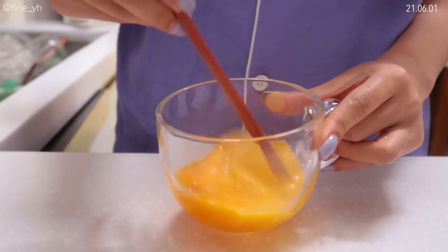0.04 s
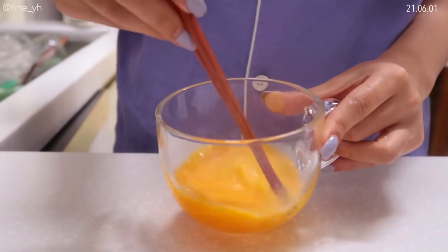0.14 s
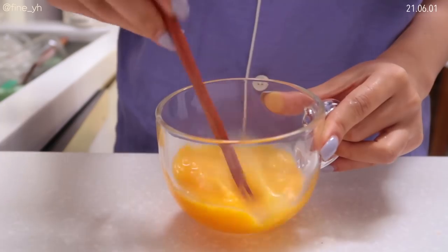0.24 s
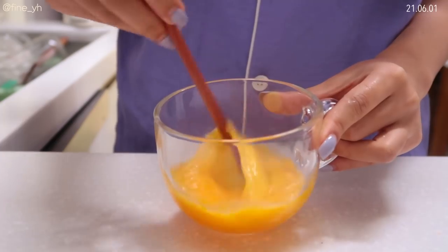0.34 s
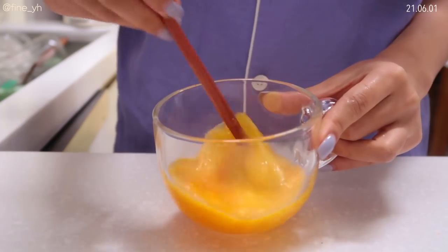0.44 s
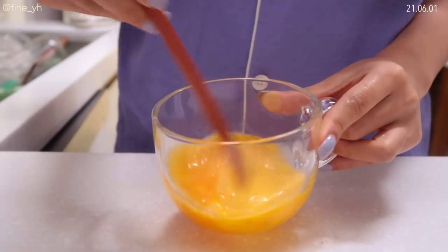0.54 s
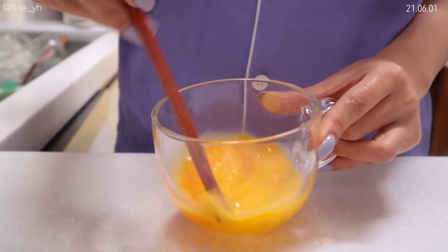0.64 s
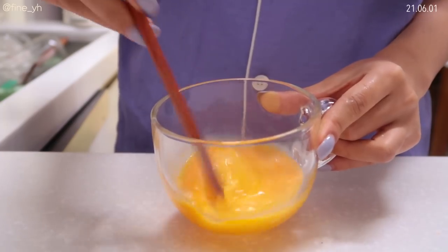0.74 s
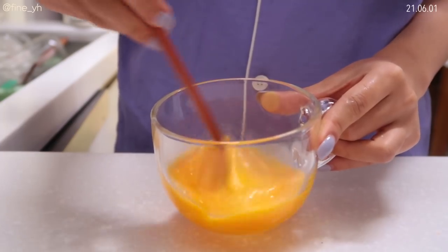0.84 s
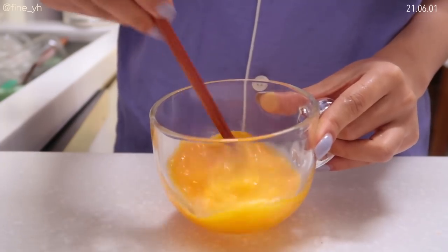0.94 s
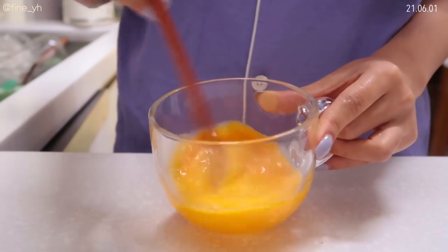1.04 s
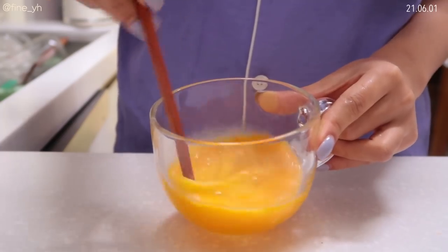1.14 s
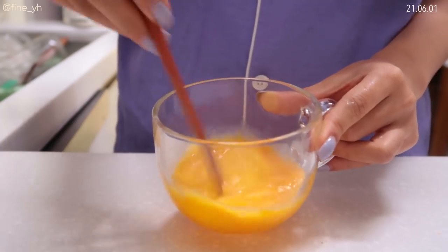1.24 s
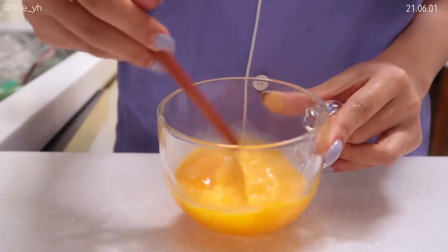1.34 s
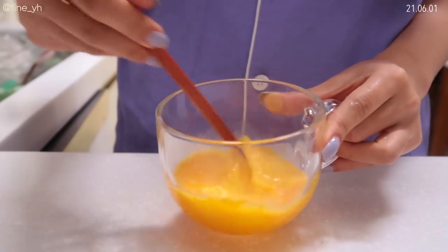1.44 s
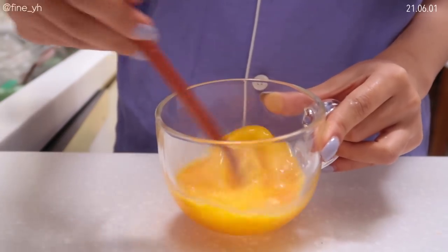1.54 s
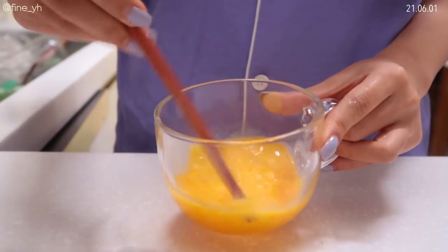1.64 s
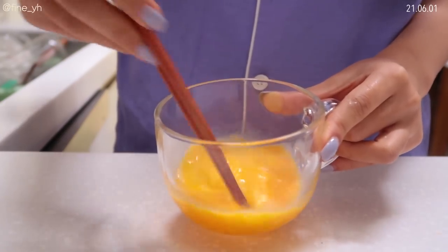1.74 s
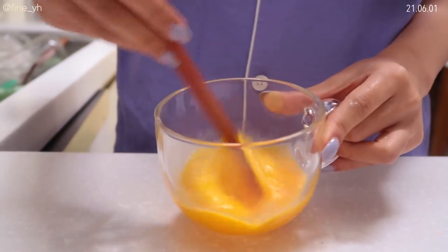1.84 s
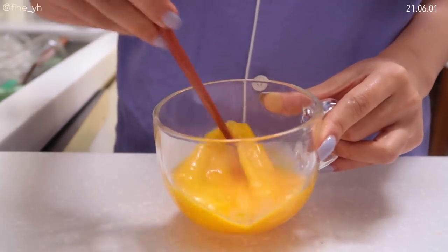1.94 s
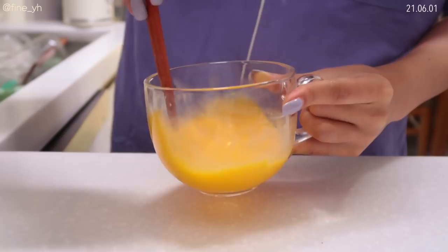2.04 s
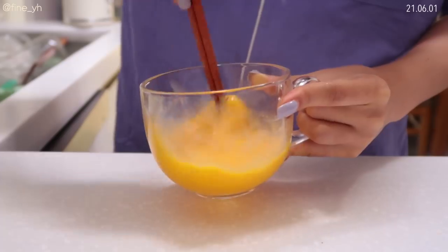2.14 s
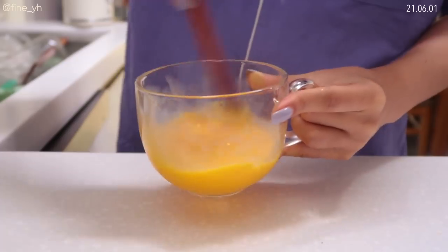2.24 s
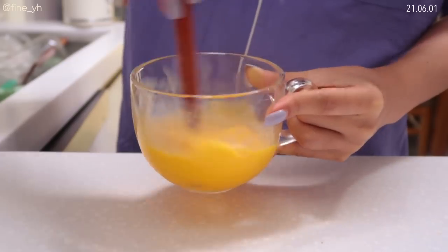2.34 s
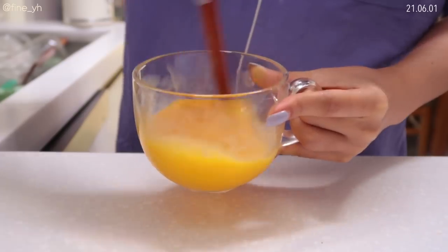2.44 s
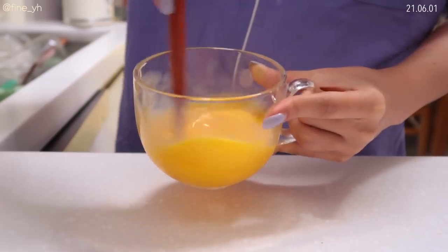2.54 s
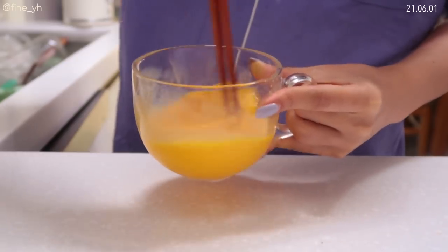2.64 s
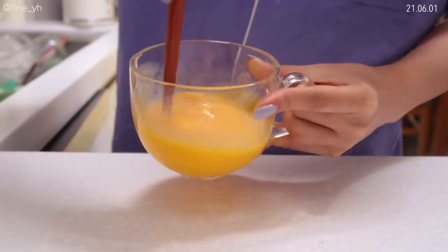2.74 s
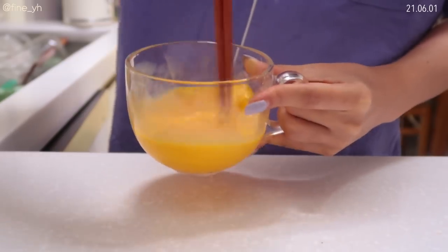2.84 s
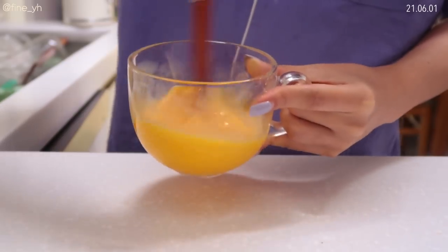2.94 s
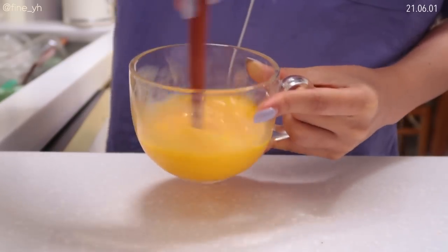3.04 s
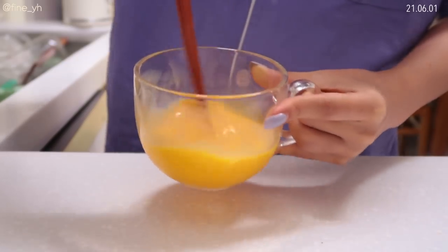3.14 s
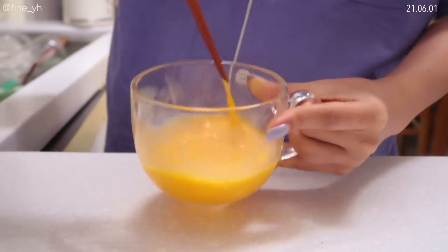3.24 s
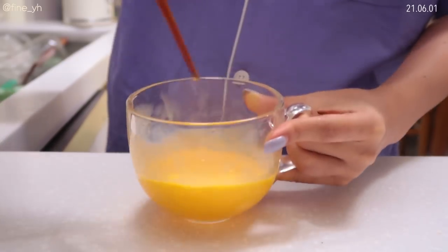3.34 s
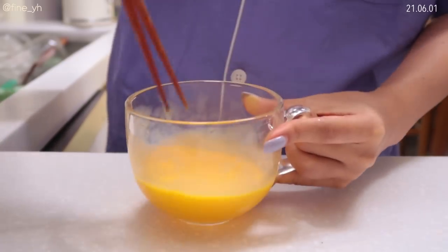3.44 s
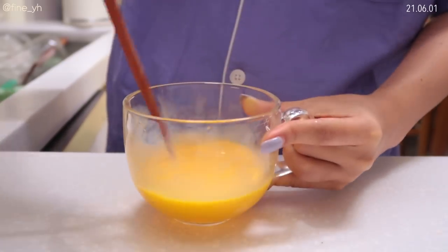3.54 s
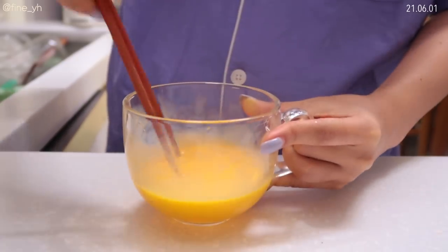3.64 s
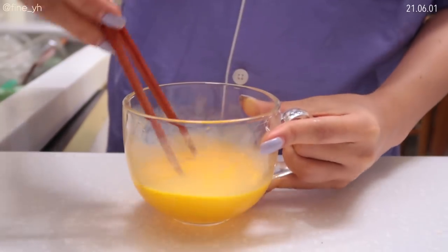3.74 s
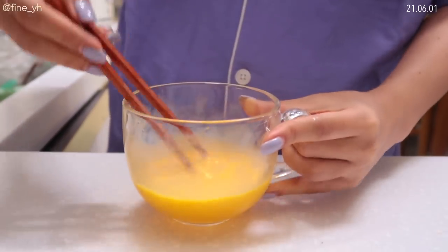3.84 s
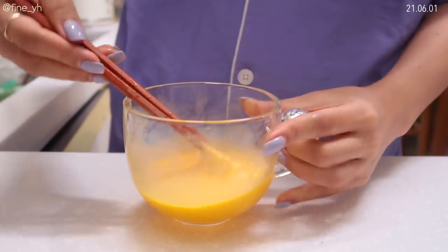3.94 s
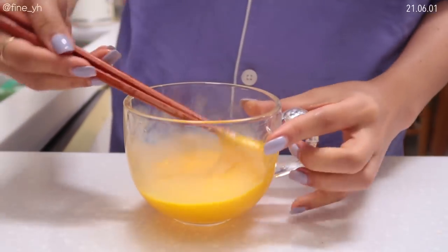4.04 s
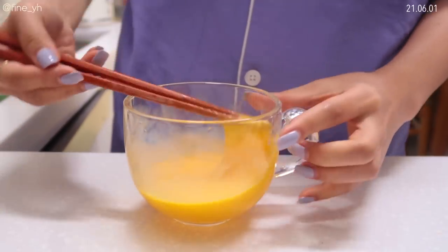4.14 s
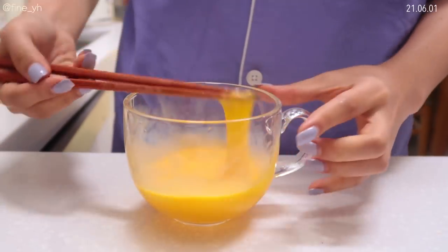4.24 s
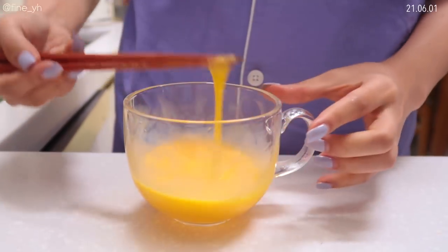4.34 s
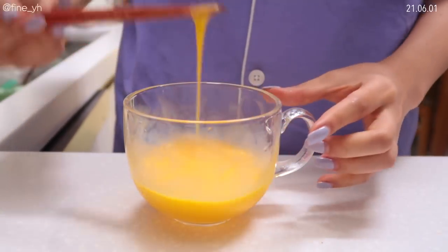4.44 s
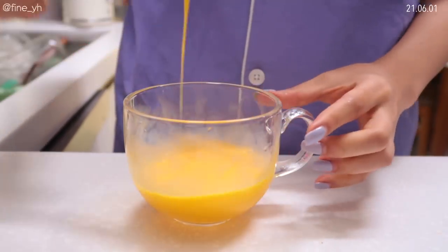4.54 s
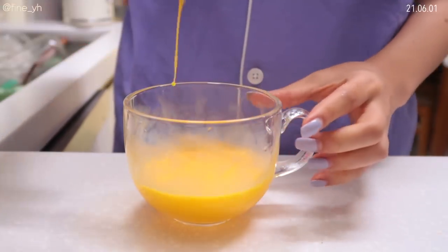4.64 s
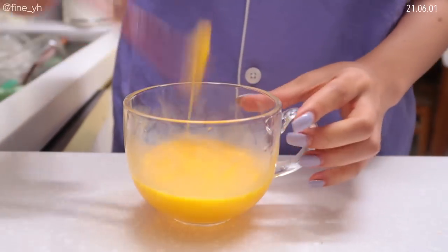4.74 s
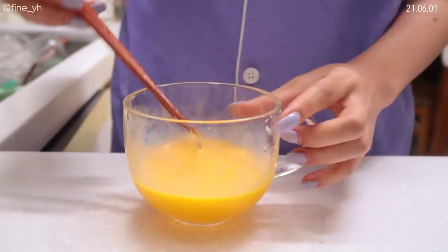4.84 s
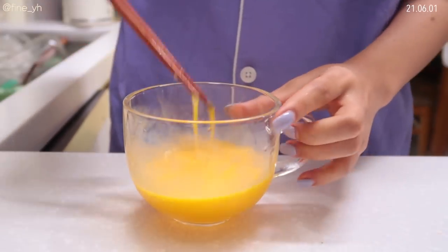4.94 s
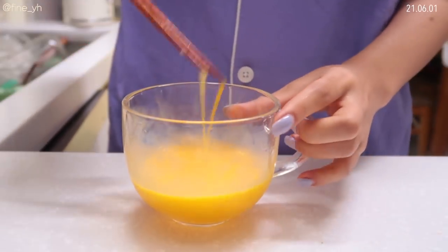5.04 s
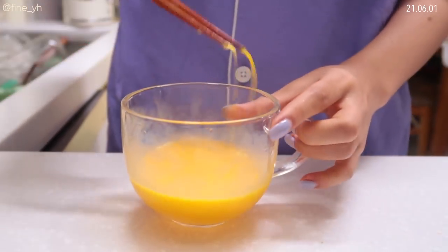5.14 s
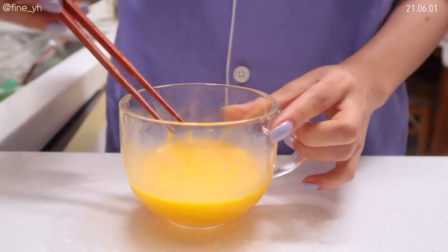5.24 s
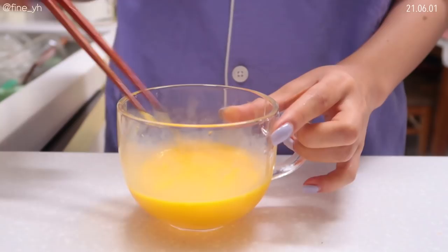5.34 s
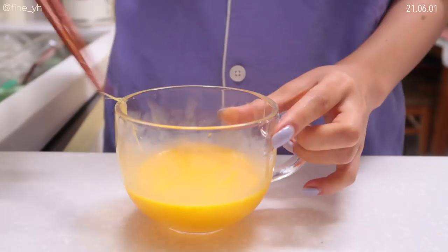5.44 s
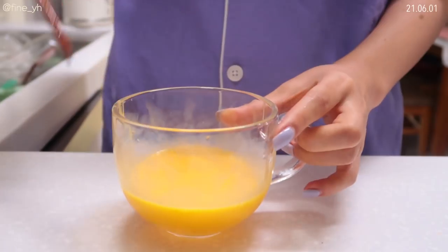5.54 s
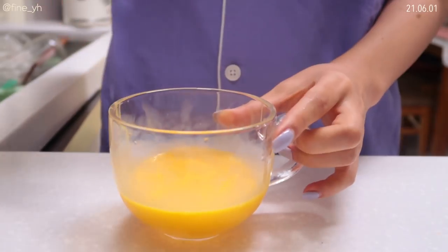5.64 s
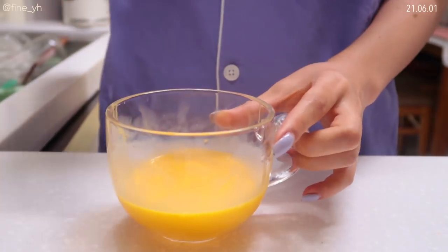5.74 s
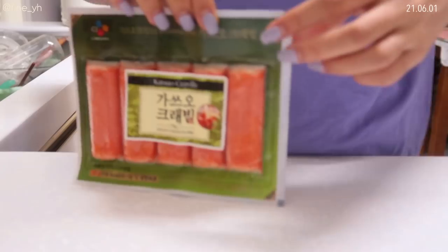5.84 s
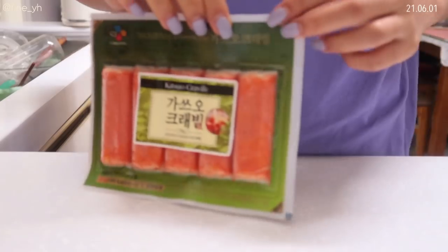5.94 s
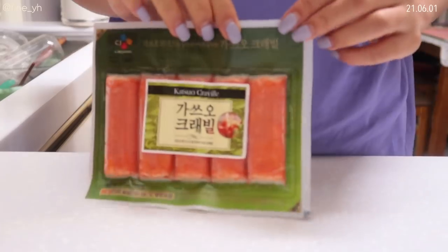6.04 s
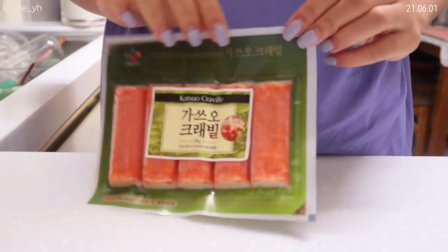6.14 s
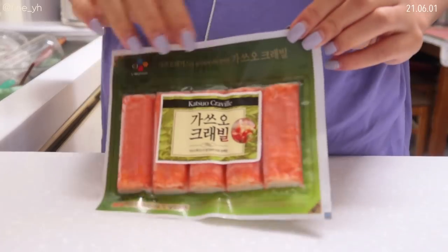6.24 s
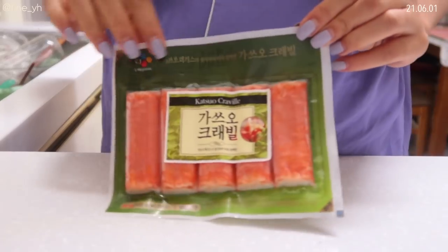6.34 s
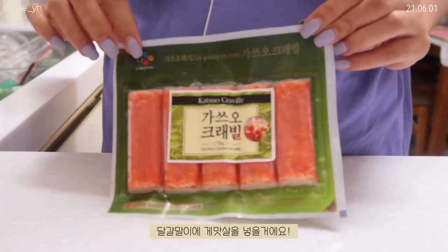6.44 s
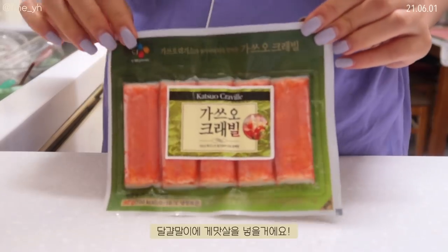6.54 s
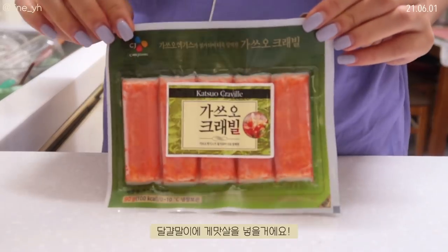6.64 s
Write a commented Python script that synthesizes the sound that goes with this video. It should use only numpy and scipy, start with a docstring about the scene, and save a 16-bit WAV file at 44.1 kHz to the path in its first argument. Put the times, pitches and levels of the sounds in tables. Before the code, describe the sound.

Close to the microphone, a dense, uneven rattle of wood on egg-damped glass runs unnaturally fast, then cuts to normal-speed beating in a lifted cup. A hard set-down rumbles the counter, followed by soft knocks, scrapes and two bright glass taps. After a cut, plastic film crackles faintly, over low room hiss and hum in a small kitchen.

```python
"""Wooden chopsticks beat eggs in a thick glass cup: first on the counter at double playback speed, then,
after a cut, in a cup held up at normal speed. Wood rings the egg-damped glass; egg churns.
The cup is set down with a slap and a rumble, settles and is knocked; sticks tap and scrape the ringing glass.
After another edit, fingers handle a plastic packet that pops and rustles. A quiet kitchen lies underneath,
with echoes, hiss and mains hum, while the camera's gain control sags after loud blows."""
import sys
import numpy as np
from scipy import signal
from scipy.fft import rfft, irfft, next_fast_len
from scipy.io import wavfile
from scipy.ndimage import uniform_filter1d

SR = 44100
rng = np.random.default_rng(int(sys.argv[2]) if len(sys.argv) > 2 else 0)


def wrap_up_sound(samples):
    """Save the sound to the file named by the first command line argument, as 16-bit audio."""
    columns = np.atleast_2d(samples).T
    # keep every value between -1 and 1, then stretch to whole-number steps
    tamed = np.clip(columns, -1, 1)
    steps = np.round(tamed * 32767).astype(np.int16)
    wavfile.write(sys.argv[1], SR, steps)


def boost(x):
    """Linear amplitude factor 10**(x/20) for a level x in decibels (scalar or array-like)."""
    u = np.asarray(x, float) / 20
    return 10 ** u


N = 295029

# Event times are heard times. Pitches and ring times are those in the kitchen, before any speeding up.
# Ring times are t60: seconds to fall by 60 dB.
SPEEDUP, FAST_END, PACKET_START = 2, 2.0835, 5.835  # playback speed of the first shot; edits in heard seconds
FAST_SAMPLES = round(FAST_END * SR)
LONG = N + (SPEEDUP - 1) * FAST_SAMPLES + SR // 2  # samples of kitchen time

# Beats in the egg. Each row: start in seconds, strength in dB, a code, bright tick in dB.
# Code: a letter a-g for the wet mode that rings loudest (capital for a clean ping), then where the tips land:
# - high on the wall, ~ midway, + hard on the bottom.
BEATS = [(.001, -17, "a", -42.5), (0.0378, -13.5, "d", -20.5), (0.0765, -4.5, "e", -26),
         (0.1198, -11.5, "e", -35.5), (.166, -26.5, "d-", -45.5), (0.2027, -13.5, "d", -22),
         (0.234, -9, "f", -26.5), (0.283, -9, "d", -17.5), (0.325, -11.5, "D-", -51),
         (0.3682, -24.5, "a", -21.5), (0.4046, -14, "d~", -37.5), (0.431, -9, "b-", -34),
         (0.4465, -20, "d", -23), (.482, -27, "a", -39), (0.489, -20.5, "d-", -45),
         (0.5174, -13, "B-", -29.5), (0.5345, -20.5, "d", -18.5), (0.5752, -27, "e~", -46),
         (0.59, -24, "d~", -53), (0.6209, -15.5, "f", -24), (0.6528, -23.5, "a", -44),
         (0.708, -20.5, "e", -24), (0.7334, -15.5, "a+", -36), (0.791, -15.5, "d", -25.5),
         (0.826, -13, "G~", -36), (0.875, -26, "d", -32.5), (0.9037, -19, "e~", -35),
         (0.9568, -17.5, "d", -40), (0.976, -17, "a+", -23), (.995, -26, "a", -34), (1.037, -14, "d", -30),
         (1.061, -21.5, "g", -37.5), (1.079, -31, "a", -39), (1.1214, -29.5, "a", -27),
         (1.1559, -33.5, "a", -44), (1.1943, -39, "a", -46), (1.209, -24, "b", -34.5),
         (1.236, -30.5, "a", -36.5), (1.274, -33, "b", -42), (1.2927, -18, "d+", -27),
         (1.311, -14.5, "a+", -29.5), (1.3276, -20.5, "d~", -29.5), (1.3574, -28, "a", -42.5),
         (1.3707, -14, "g+", -29), (1.4116, -21.5, "g~", -50.5), (1.461, -14.5, "f+", -19.5),
         (1.486, -20.5, "d~", -37), (1.5168, -19.5, "A-", -40.5), (1.525, -26, "A-", -47),
         (1.545, -9, "G", -36), (1.5708, -21, "b", -38), (1.583, -22, "b", -36.5),
         (1.6265, -9.5, "a+", -24), (1.655, -16.5, "d~", -34), (1.691, -6.5, "A-", -30),
         (1.7138, -10, "d", -26.5), (1.741, -5.5, "E~", -32), (1.774, -18, "A-", -38),
         (1.7966, -13, "e+", -20), (1.8213, -10.5, "f+", -36), (1.836, -14.5, "D-", -43),
         (1.8558, -7.5, "A-", -35.5), (1.8776, -16, "e", -27.5), (1.9026, -14, "d+", -25),
         (1.9607, -12.5, "e", -25), (1.9811, -15, "a", -21.5), (1.992, -9, "d+", -35.5),
         (2.043, -16, "f", -31), (2.068, -15.5, "d", -41), (2.08, -11.5, "d", -36),
         (2.084, -12.5, "g", -24), (2.211, -31, "A", -49), (2.309, -9, "g", -30), (2.386, 0.5, "F", -29.5),
         (2.413, -12, "G", -37), (2.462, -9.5, "c", -47.5), (2.575, 3, "D", -22), (2.672, -17.5, "d", -62),
         (2.749, -3, "d", -23.5), (2.779, -14, "A", -36), (2.84, -17.5, "g", -65.5),
         (2.922, -10.5, "a", -22), (2.929, -5, "d", -33), (2.993, -13.5, "c", -38.5),
         (3.083, -6.5, "D", -33.5), (3.089, -13, "a", -50)]
# Thud in dB by where the tips land, keyed by the sign in the code.
DEPTH_DB = {"": -0.5, "-": -13, "~": -3.5, "+": 3}
# Sticks and egg-covered wall. Each row: pitch in Hz, level in dB, ring time in seconds.
WET_MODES = [(1130, -6, 0.03), (1418, -10.5, 0.047), (1690, -3.5, 0.027), (2614, 2.5, 0.03),
             (2950, -5, 0.041), (3954, -5.5, 0.027), (2379, -1.5, .03)]
# Counter top. Each row: pitch in Hz, level in dB, ring time in seconds.
COUNTER_MODES = [(146, -1.5, 0.1), (247, 4, 0.064), (392, -0.5, 0.072), (453, -4, 0.06), (630, -6.5, 0.054)]
# Cup meets counter: start in seconds, level in dB.
SET_DOWN = (3.4025, 3.4)
# Cup settling, knocks and rim taps.
# Each row: start in seconds, glass ring in dB, knock against ring in dB, thud in dB, tick in dB.
GLASS_HITS = [(3.621, -33.5, 8.5, -23.5, -65), (3.875, -40, 8.5, -47, -73), (3.985, -42, 7.5, -39.5, -68),
              (4.824, 4, -2, -15.5, -17.5), (5.283, -9, 9.5, -15, -16.5)]
# Free glass. Each row: pitch in Hz, level in dB before tilting, ring time in seconds before damping.
GLASS_MODES = [(1362, -2, 0.1), (3284, -8, 0.14), (4296, -24, 0.34), (5136, -31, 0.23), (5846, -24, 0.17),
               (6428, -34, 0.26), (1380, -27, 0.5), (8624, -49, 0.22), (9555, -46, 0.22), (10600, -48, .15)]
# Sticks dragged on the glass, one list per drag. Each row: time in seconds, level in dB.
SCRAPES = [
    [(3.69, -39), (3.76, -58.5)],
    [(3.88, -35), (3.9, -29.5), (3.955, -52), (4.05, -52), (4.13, -50), (4.27, -62.5)],
    [(5.29, -25.5), (5.42, -40), (5.53, -62)],
]
# Light and firm drags: one treble tilt per drag, in dB per octave.
SCRAPE_TILTS = [-9.5, -7, 2.5]
# Egg churning. Each row: time in seconds, level in dB.
SLOSH_LEVEL = [(0, -55), (2.08, -53), (2.09, -43), (2.26, -57), (3.1, -51), (3.25, -63)]
# Tone of the churning. Each row: frequency in Hz, relative level in dB per Hz.
SLOSH_COLOUR = [(150, -13), (1200, -15.5), (3000, -16), (7000, -35)]
# Packet creases. Each row: start in seconds, level in dB.
CREASES = [(5.846, -38), (5.897, -16), (5.911, -28), (5.922, -25), (6.042, -36), (6.11, -39.5),
           (6.171, -40), (6.248, -37), (6.351, -39), (6.428, -42.5), (6.595, -38.5)]
# Rustle: a faint rubbing before the last edit, then the packet after it.
# Each row: time in seconds, level in dB.
RUSTLE_LEVEL = [(5.45, -58), (5.83, -67), (5.835, -49.5), (5.95, -51.5), (6.3, -57), (6.54, -62),
                (6.62, -47), (6.69, -57)]
# Packet film. Each row: pitch in Hz, width in Hz, level in dB.
FILM_MODES = [(969, 510, 0), (1594, 660, -1), (2407, 240, -6.5), (3900, 1900, 4.5)]
# Kitchen echoes. Each row: frequency in Hz, ring time in seconds.
KITCHEN_T60 = [(150, 0.35), (1500, 0.25), (10000, 0.058)]
# Tone of the room hiss. Each row: frequency in Hz, relative level in dB per Hz.
AIR_COLOUR = [(20, -31), (34, -8.5), (187, -15), (440, -19), (1510, -28.5), (3090, -31), (15000, -52.5)]
# How alike the hiss is left and right. Each row: frequency in Hz, likeness from 0 to 1.
AIR_LIKENESS = [(60, 1), (400, 0.13)]
# Added level of the room noise: one value in dB for each of the three shots.
SHOT_AIR_DB = [0, 3.5, -3]
# Side against mid of the two microphone ports. Each row: frequency in Hz, level in dB.
PORTS = [(300, -27.5), (2000, -21), (5000, -2), (9000, -2)]

THUD_DB = -22.5  # cup rocking on the counter under a typical beat
CLEAN_DB = -11  # a clean ping carries this much less clatter
RING_CYCLES = 49  # t60 of the loudest wet mode, in cycles
CHATTER_S = 0.029  # t60 of the wet skid that follows a contact, in seconds
# A sharper tick rings higher glass modes: dB per octave per dB, and the tick against ring that leaves them even.
TILT_PER_DB, LEVEL_TICK_DB = 0.72, -29
FOLD_HZ, FOLD_HZ_PER_DB = 733, -4  # a larger fold rings lower
AIR_DB, HUM_DB, HUM_HZ = -49.5, -53, 59  # hiss and hum levels before the shot's own offset; hum pitch


def evened(x):
    """Scales to rms 1."""
    return x / np.sqrt(np.mean(x ** 2) + 1e-20)


def read(points, hz):
    """Reads a table on a log-frequency axis."""
    f, value = np.transpose(points)
    return np.interp(np.log(hz + 1), np.log(f + 1), value)


def lived(s):
    """Kitchen time of a heard time; a half-second gap lets the fast shot's tails die unheard."""
    s = np.asarray(s)
    return s + (SPEEDUP - 1) * np.minimum(s, FAST_END) + 0.5 * (s >= FAST_END)


def level(rows):
    """Gain over kitchen time from (s, dB) rows, silent outside them."""
    s, db = np.transpose(rows)
    return boost(np.interp(np.arange(LONG) / SR, lived(s), db, -150, -150))


def add(mix, s, sound):
    """Mixes a sound in at a heard time."""
    part = mix[int(lived(s) * SR):][:len(sound)]
    part += sound[:len(part)]


def coloured(x, points):
    """Filters by a (Hz, dB) table."""
    size = next_fast_len(x.shape[-1])
    gain = boost(read(points, np.fft.rfftfreq(size, 1 / SR)))
    return irfft(rfft(x, size) * gain, size)[..., :x.shape[-1]]


def rung(modes, spread_db, damp=1, seconds=0.46, rise_s=0.00026):
    """Struck things ring as a sum of dying sines; each blow weights them anew by spread_db."""
    hz, db, t60 = np.transpose(modes)[:, :, None]
    t = np.arange(int(seconds * SR)) / SR
    db = db + spread_db * rng.standard_normal(hz.shape)
    dying = boost(db - 60 * t / (t60 * damp))
    x = (dying * np.sin(2 * np.pi * hz * t)).sum(0)
    x *= 1 - np.exp(-t / rise_s)  # the contact lasts a moment
    return x / np.linalg.norm(boost(db))


def burst(lo_hz, hi_hz, t60, size=8000):
    """A crack is dying noise kept to a band, with the energy of its envelope."""
    envelope = boost(-60 * np.arange(size) / SR / t60)
    noise = rng.standard_normal(size) * envelope
    sos = signal.butter(3, [lo_hz, hi_hz], "band", fs=SR, output="sos")
    band = signal.sosfilt(sos, noise)
    return band * np.linalg.norm(envelope) / np.linalg.norm(band)


def beats():
    """Beats ring the egg-damped wall briefly and, in the first shot, rock the cup on the counter."""
    out = np.zeros(LONG)
    for s, db, code, tick_db in BEATS:
        hz = WET_MODES["abcdefg".index(code[0].lower())][0] * rng.uniform(0.98, 1.02)
        thud_db = -90  # a lifted cup shakes no counter
        if s < FAST_END:
            thud_db = THUD_DB + 0.15 * (tick_db + 29) + DEPTH_DB[code[1:]]
        pair = [(hz, 0, RING_CYCLES / hz), (hz * 1.05, -5, RING_CYCLES / hz)]  # a split mode
        hit = knock(db + CLEAN_DB * code[0].isupper(), hz, thud_db, tick_db)
        ring = boost(db - 2) * rung(pair, 0, rise_s=0.00075)
        add(out, s, hit + ring)
        add(out, s + rng.uniform(0.0015, 0.0049), boost(-12) * hit)  # the second stick
    return out


def knock(db, hz, thud_db, tick_db):
    """What every blow shares: wet body, a crack around its pitch, bright tick and counter thud."""
    shift = rng.uniform(0.94, 1.06)  # egg on the wall detunes it from blow to blow
    body = chattered(rung([(f * shift, m, t) for f, m, t in WET_MODES], 2))
    crack = boost(-11.5) * burst(hz / 1.67, hz * 2.14, 0.081)
    tick = boost(tick_db) * burst(2400, 12500, 0.055)
    rumble = boost(thud_db - 10) * (burst(55, 290, 0.15) + burst(560, 1100, 0.062))
    hit = boost(db - 4) * body + boost(thud_db) * rung(COUNTER_MODES, 3)
    hit[:8000] += boost(db) * crack + tick + rumble
    return hit


def chattered(x):
    """A contact followed by a short skid roughens a ring."""
    n = np.arange(900)
    drive = boost(-13) * rng.standard_normal(900) * boost(-60 * n / SR / CHATTER_S)
    drive[0] = 1  # the contact itself
    return signal.oaconvolve(x, drive / np.linalg.norm(drive))[:len(x)]


def set_down():
    """A hard slap, then a dense counter rumble as cup and counter shiver on."""
    out = np.zeros(LONG)
    s, db = SET_DOWN
    slap = boost(-17) * burst(2500, 7000, 0.025)  # the higher the band, the sooner it dies
    slap += burst(1100, 2500, 0.038)
    slap += boost(-9) * burst(280, 1400, 0.16)
    body = boost(3) * rung(COUNTER_MODES + [(WET_MODES[0][0], 7, 0.05)], 0)
    body[:8000] += slap
    body += boost(-21.5) * burst(600, 2800, 0.33, size=len(body))  # the shiver
    add(out, s, boost(db) * body)
    return out


def glass_hits():
    """Settling, knocks and rim taps ring the free glass, each doubled a moment later with a weaker ring."""
    out = np.zeros(LONG)
    for s, glass_db, knock_db, thud_db, tick_db in GLASS_HITS:
        modes = tilted(TILT_PER_DB * (tick_db - glass_db - LEVEL_TICK_DB))
        for late, db in (0, glass_db), (0.0059, glass_db - 5.5):
            wood_db = db + knock_db
            hit = boost(db) * rung(modes, 0, damp=0.87) + knock(wood_db, 2800, thud_db, tick_db)
            hit[:8000] += boost(wood_db - 8.5) * burst(370, 1400, 0.07)  # a wooden clack
            hit[:8000] += boost(wood_db - 26) * burst(1200, 6000, 0.23)  # dense rattle of small modes
            add(out, s + late, hit)
    return out


def tilted(tilt_db):
    """Glass modes as a softer or harder contact weights them, in dB per octave."""
    lowest_hz = GLASS_MODES[0][0]
    return [(hz, db + tilt_db * np.log2(hz / lowest_hz), t60) for hz, db, t60 in GLASS_MODES]


def slips(per_second, spread_db, limit=np.inf):
    """Random clicks of either sign, with uneven strength."""
    happens = rng.random(LONG) < per_second / SR
    strength = boost(spread_db * np.minimum(rng.exponential(1, LONG), limit))
    return happens * strength * rng.choice([-1, 1], LONG)


def scrapes():
    """Uneven slips of wood on glass ring its modes."""
    drag = evened(slips(500, 2))
    out = np.zeros(LONG)
    for rows, tilt_db in zip(SCRAPES, SCRAPE_TILTS):
        body = rung(tilted(tilt_db), 0, damp=0.27)  # the stick damps the ring
        body[:8000] += boost(-33) * burst(510, 6000, 0.013)
        out += signal.oaconvolve(drag * level(rows), body / np.linalg.norm(body))[:LONG]
    return out


def slosh():
    """Dense wet grains of churned egg: noise whose strength jumps every 200 samples."""
    size_db = 3 * np.minimum(rng.exponential(1, LONG // 200 + 1), 4)
    grains = rng.standard_normal(LONG) * np.repeat(boost(size_db), 200)[:LONG]
    return evened(coloured(grains, SLOSH_COLOUR)) * level(SLOSH_LEVEL)


def creases():
    """Each packet crease pops: three hollow modes, a snap and a longer crackle of noise."""
    out = np.zeros(LONG)
    for s, db in CREASES:
        hz = FOLD_HZ + FOLD_HZ_PER_DB * db
        pop = rung([(hz, 0, 0.05), (hz * 1.2, -9, 0.08), (hz * 1.95, -16, 0.03)], 0)
        snap_db = -0.45 * db  # small folds snap, large ones only bump
        pop[:8000] += boost(snap_db - 28) * burst(750, 3700, 0.035)
        pop[:8000] += boost(-27.5) * burst(1200, 4100, 0.14)
        add(out, s, boost(db) * pop)
    return out


def rustle():
    """Small snaps ring ten patches of film, picked at random, each weighting the modes its own way."""
    snaps = slips(1000, 3.1, limit=4.5)
    # fingers move over differently stretched film; the same sound, faint, is the rubbing before it
    panel = np.repeat(rng.integers(0, 10, LONG // 2000 + 1), 2000)[:LONG]
    modes = [(hz, db, 2.2 / width) for hz, width, db in FILM_MODES]  # a wider mode dies sooner
    out = np.zeros(LONG)
    for k in range(10):
        out += signal.oaconvolve(snaps * (panel == k), rung(modes, 6.7))[:LONG]
    return evened(out) * level(RUSTLE_LEVEL)


def kitchen(x):
    """Sparse echoes of random sign, each band dying at its own speed."""
    echoes = np.zeros((2, SR // 2))
    at = np.arange(200, SR // 2 - 20, 20) + rng.integers(0, 20, (2, (SR // 2 - 201) // 20))
    np.put_along_axis(echoes, at, rng.choice([-1., 1.], at.shape), 1)
    echoes[1] = 1.1 * echoes[0] + 0.44 * echoes[1]  # left and right are much alike
    hz, t, z = signal.stft(echoes, SR, nperseg=256)
    fade = boost(-60 * t / read(KITCHEN_T60, hz)[:, None])
    tail = signal.istft(z * fade, SR, nperseg=256)[1]
    tail /= np.linalg.norm(tail, axis=1)[:, None]
    return signal.oaconvolve(x[None], tail, axes=1)[:, :LONG]


def air():
    """Room hiss, alike in both ports only in the bass, with a wavering mains hum."""
    size = next_fast_len(LONG)
    hz = np.fft.rfftfreq(size, 1 / SR)
    a, b = rfft(rng.standard_normal((2, size)))
    same = read(AIR_LIKENESS, hz)
    pair = np.array([a, same * a + np.sqrt(1 - same ** 2) * b])
    hiss = irfft(pair * boost(read(AIR_COLOUR, hz)), size)[:, :LONG]
    waver = evened(uniform_filter1d(rng.standard_normal(LONG), 3000))
    tone = np.sqrt(2) * np.sin(2 * np.pi * HUM_HZ * np.arange(LONG) / SR)
    hum = boost(HUM_DB + 3.1 * waver) * tone
    shot = np.searchsorted(lived([FAST_END, PACKET_START]) * SR, np.arange(LONG))
    return (boost(AIR_DB) * evened(hiss) + hum) * boost(SHOT_AIR_DB)[shot]


def scene():
    """All sources in the kitchen, the first shot played faster and so higher."""
    near = beats() + set_down() + glass_hits() + scrapes() + slosh() + creases() + rustle()
    # the near sources carry little deep bass
    near = signal.sosfilt(signal.butter(2, 90, "high", fs=SR, output="sos"), near)
    # the sound wanders randomly a little left and right
    sway = evened(uniform_filter1d(rng.standard_normal(LONG), 900))
    turned = signal.hilbert(near, next_fast_len(LONG))[:LONG].imag  # a phase lead of one port
    side = coloured(turned * sway, PORTS)
    lived_mix = np.array([near + side, near - side]) + boost(-15) * kitchen(near) + air()
    fast = signal.resample_poly(lived_mix[:, :SPEEDUP * FAST_SAMPLES], 1, SPEEDUP, axis=1)
    return np.concatenate([fast, lived_mix[:, FAST_SAMPLES - N:]], 1)


def low_pass(x):
    """Removes everything above the highest recorded frequency."""
    return signal.sosfilt(signal.butter(12, 16830, fs=SR, output="sos"), x)


def record(dry):
    """Gain control falls quickly and recovers slowly within each shot; peaks past full scale clip."""
    power = uniform_filter1d((dry ** 2).mean(0), 600, origin=299)
    power_db = 10 * np.log10(abs(power) + 1e-12)
    shots = np.split(power_db, [FAST_SAMPLES, round(PACKET_START * SR)])
    over_db = []
    for part, recovery_db_per_s in zip(shots, (14, 6.5, 6.5)):
        fall = np.arange(len(part)) * recovery_db_per_s / SR
        held_db = np.maximum.accumulate(part + fall) - fall  # the loudest so far, sinking steadily
        over_db.append(np.maximum(held_db + 24, 0))  # acts above -24 dB
    duck_db = 0.43 * uniform_filter1d(np.concatenate(over_db), 600, origin=299)
    return low_pass(np.clip(dry / boost(duck_db), -1, 1))


dry = scene()
out = record(dry)
wrap_up_sound(out)
```